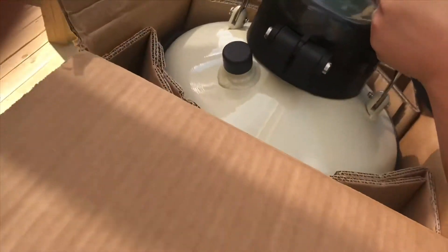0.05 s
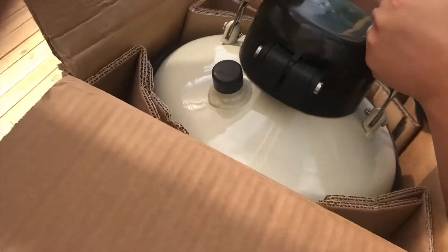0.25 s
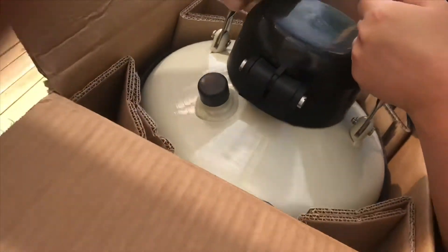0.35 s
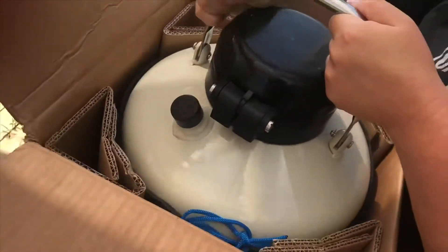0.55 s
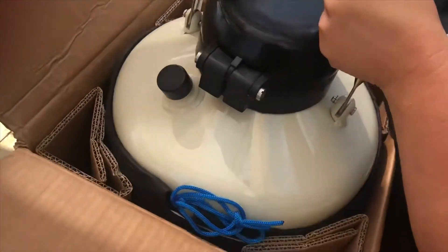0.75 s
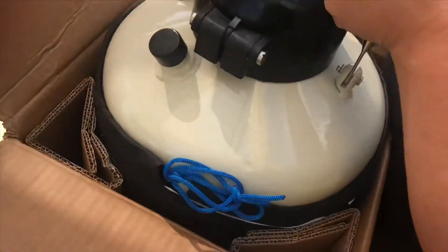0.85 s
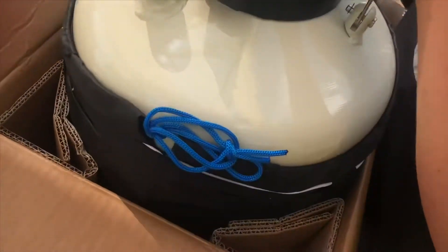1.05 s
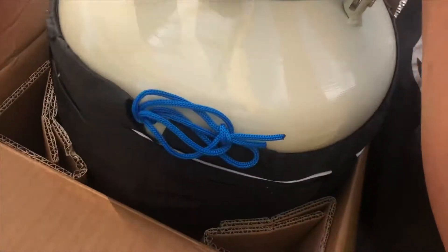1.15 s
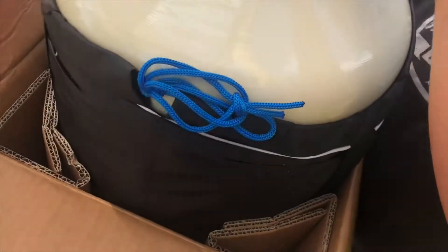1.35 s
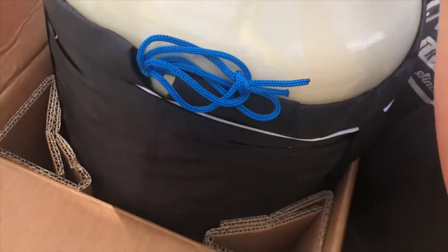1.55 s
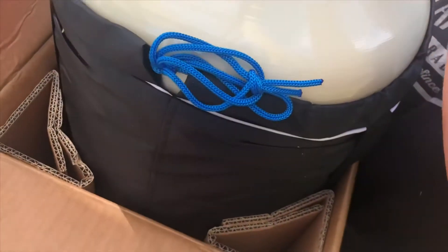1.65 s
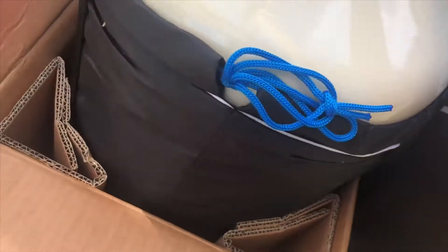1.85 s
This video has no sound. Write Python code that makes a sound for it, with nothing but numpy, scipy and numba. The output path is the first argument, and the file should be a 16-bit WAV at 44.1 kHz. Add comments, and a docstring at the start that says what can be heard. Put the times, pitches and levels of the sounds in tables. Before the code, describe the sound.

A cloth-sleeved metal tank scrapes out of a cardboard box, close up indoors. Short scuffs, thumps and a cardboard snap come around 0.3 seconds. From 0.5 seconds a long hissing slide runs over a low rumble, with dull knocks and a couple of snaps near 1 second. At about 1.6 seconds the tank judders free, then the hiss dulls and fades with a few faint dry ticks.

```python
"""A metal tank in a cloth sleeve is lifted out of a tight cardboard box, close up, indoors.
It opens on a few short scuffs, with thumps and a cardboard snap as the tank comes free.
From about half a second, one long hissing slide runs over the paper fibres, while the box walls
rumble under the drag, and thump and snap where the tank catches. Near 1.5 s it judders clear of
the packing; the hiss dulls and falls away, and a few dry fibres tick as the box settles."""
import sys
import numpy as np
from scipy import signal
from scipy.fft import rfft, irfft
from scipy.io import wavfile
from numba import njit

SR = 44100
rng = np.random.default_rng(int(sys.argv[2]) if len(sys.argv) > 2 else 0)


def wav_out(sig):
    """Save sig, one row per channel (or a flat mono array), as 16-bit PCM at SR to the path in sys.argv[1]."""
    wavfile.write(sys.argv[1], SR, np.round(np.clip(np.atleast_2d(sig).T, -1, 1) * 32767).astype(np.int16))


N = 83790

# fader moves of the long slide, ahead of trims and filters (time [s], rasp [dB], hiss [dB], sheen [dB])
SLIDE_FADERS = [(0.455,-56,-59,-66), (0.483,-40,-46.5,-53), (0.515,-42,-38.5,-47), (0.60,-41,-35,-44),
                (0.685,-41.5,-32.5,-39), (0.75,-41,-32.5,-35), (0.88,-39,-32,-35.5), (1.0,-38,-35.5,-37),
                (1.14,-37,-34,-37.5), (1.28,-41.5,-38.5,-45), (1.41,-39.5,-36,-38.5), (1.49,-40.5,-37,-39),
                (1.567,-38,-41.5,-47.5), (1.645,-41,-53.5,-59.5), (1.69,-45,-55,-60), (1.733,-40,-52,-59),
                (1.79,-61,-56.5,-61.5), (1.85,-43.5,-48.5,-54.5), (1.9,-42.5,-51,-54)]
# EQ of the slide's low rasp, mid hiss and top sheen (frequency [Hz], level [dB])
RASP_EQ = [(150, 2.5), (400, -7), (650, 1.5), (850, 0.5), (1150, -2), (1450, 1), (2000, -1), (2700, -7.5),
           (4000, -11.5), (8000, -26)]
HISS_EQ = [(1200, -14), (2400, -3), (2950, -2.5), (3400, -1), (3900, -1), (5000, -1.5), (6300, -4.5),
           (8000, -9), (12000, -47)]
SHEEN_EQ = [(4000, -19), (6000, -4.5), (7300, -2), (9500, -1), (12000, -5.5), (15500, -9)]
# the hiss brightens with the speed of the slide (time [s], sweep centre [Hz])
HISS_SWEEP = [(0.48, 3520), (0.69, 4630), (0.77, 7560), (0.88, 7440), (1.0, 4940), (1.14, 4500),
              (1.3, 5360), (1.45, 6650), (1.57, 4000), (1.66, 2430), (1.78, 2260), (1.86, 3500)]
# scuffs of the tank on the packing
# (start [s], attack [s], length [s], level [dB], rasp offset [dB], sizzle offset [dB])
SCUFF_CUES = [(-0.01, .004, 0.025, -52.5, 10, -2), (0.012, .006, 0.068, -56, 2.5, -3),
              (0.084, 0.015, 0.016, -45.5, -3.5, -12), (0.2092, 0.0012, .011, -37, -10, -10),
              (0.218, 0.0013, .012, -49.5, 4.5, -13), (0.231, 0.0028, .018, -51.5, -6, -15),
              (0.243, 0.016, 0.056, -38, -10, -5.5), (0.287, .011, 0.023, -32, -5, -5),
              (0.31, .003, 0.017, -39, -11, -6), (0.329, 0.0033, 0.1004, -47, -2, -11),
              (0.414, .005, 0.04, -54.5, 1, -18)]
# EQ of a scuff's body and of its top sizzle (frequency [Hz], level [dB])
SCUFF_EQ = [(500, -4), (1700, -11.5), (2900, -9.5), (4400, -3.5), (5250, 1), (6100, -2), (7600, -8),
            (10500, -16), (15500, -21)]
SIZZLE_EQ = [(5000, -25), (8000, -2), (11000, -6.5), (13000, 1), (15500, -1.5)]
# the tank catches on a box wall (time [s], level [dB], wall pitch [Hz])
THUMP_CUES = [(0.1975, -29, 334), (0.211, -36, 151), (0.289, -29, 374), (0.313, -27, 266),
              (0.324, -33, 194), (0.342, -33.5, 137), (0.39, -31, 190), (0.400, -39, 91),
              (0.5125, -23, 248), (0.5145, -29.5, 466), (0.525, -20.5, 186), (0.529, -30.5, 487),
              (0.549, -29.5, 165), (0.571, -27.5, 213), (0.593, -30.5, 116), (0.687, -36.5, 186),
              (0.784, -31.5, 107), (0.793, -31.5, 227), (0.807, -30, 150), (0.889, -27, 227),
              (0.897, -18.5, 450), (0.896, -19.5, 215), (0.908, -23.5, 290), (0.927, -28.5, 143),
              (1.087, -32, 233), (1.33, -31, 145), (1.352, -31, 225), (1.469, -20.5, 386),
              (1.478, -31.5, 132)]
# the tank sticks and slips as it clears the packing (time [s], level [dB], flap pitch [Hz])
JUDDER_CUES = [(1.534, -23, 247), (1.5525, -18.5, 465), (1.561, -14.5, 250), (1.5745, -19, 496),
               (1.577, -19, 212), (1.587, -23.5, 205), (1.589, -18.5, 476), (1.5995, -19, 470),
               (1.608, -18.5, 190), (1.614, -23, 323), (1.637, -26, 435), (1.650, -29.5, 208)]
# partials of pressed cardboard (pitch multiple [ratio], level [dB])
FLEX_PARTIALS = [(.45, -6.5), (0.999, 0), (2.05, -12.5)]
# resonances of the box walls (frequency [Hz], relative level [dB], t60 [s])
BOX_MODES = [(77.5, 0, 0.071), (135, -3, 0.037), (170, 2.5, 0.13), (210.5, -5, 0.071), (264, -9, 0.071),
             (382, 3, 0.05), (514, 7, 0.13)]
# cardboard creases snap (time [s], level [dB], pitch [Hz])
SNAP_CUES = [(0.2591, -29, 2880), (0.2835, -15, 1550), (0.3317, -31.5, 2620), (0.9587, -17.5, 1340),
             (1.07, -23, 1560), (1.748, -39, 4270), (1.837, -29, 3080)]
# ring of a snapping crease (pitch multiple [ratio], relative level [dB], t60 [s])
CREASE_MODES = [(.36, 0.5, 0.033), (.67, 5.5, 0.021), (1, 11, 0.0095), (1.3, 13, 0.0042),
                (2.75, 6.5, 0.0045)]
# fader moves of the dragged box's rumble, ahead of its trim (time [s], level [dB])
RUMBLE_FADER = [(0, -37), (.17, -40.5), (.23, -31.5), (.28, -45), (.41, -38), (.46, -42), (.52, -51),
                (.6, -32), (.73, -42), (.82, -30), (1.1, -42.5), (1.27, -37), (1.36, -36.5), (1.62, -42),
                (1.74, -36), (1.8, -43), (1.9, -65)]
# single dry fibres tick as the box settles (time [s], level [dB])
TICK_CUES = [(1.681, -46), (1.6885, -44), (1.8075, -49)]
# EQ of the rumble, a fibre tick and the room tone (frequency [Hz], level [dB])
RUMBLE_EQ = [(22, 3), (40, -3), (60, 2.5), (100, 0), (200, -9), (330, -12), (700, -27), (2000, -43)]
TICK_EQ = [(3000, -17), (6500, 0), (15000, -3)]
ROOM_TONE_EQ = [(40, 8), (150, -1), (500, -1), (1500, -9), (3000, -13.5), (6000, -15.5), (9000, -37),
                (15000, -45)]
# echoes between the rising tank and the box walls (first delay [ms], last delay [ms], gain [ratio])
GAP_ECHOES = [(0.67, 0.515, 0.056), (2.5, 1.26, -0.042), (1.64, 2.29, 0.1)]

RASP_TRIM_DB, HISS_TRIM_DB, SHEEN_TRIM_DB = 1.5, -1.5, 0.2
FOCUS_DB, FOCUS_DAMPING = -5, 0.45
RASP_CUTOFF_RATIO, RASP_DAMPING = 0.56, 1.17  # the rasp's cutoff rides below the sweep centre
FIBRES_PER_S, FIBRE_SPREAD_DB = 18000, 1.6
CHATTER_PER_S, CHATTER_DB = 120, 0.47
ROOM_T60_S, ROOM_ONSET_S, ROOM_TOP_HZ, ROOM_WET_DB = 0.16, 0.011, 2960, -15
ROOM_TONE_DB = -56
LOW_CUT_HZ, HIGH_CUT_HZ = 45, 15800


def slide(t):
    """The sleeve drags on cardboard: rasp, hiss and sheen from the same slips, brighter with speed."""
    times, rasp_db, hiss_db, sheen_db = np.array(SLIDE_FADERS).T
    fade_in = np.clip((t - times[0]) / 0.017 + 1, 0, 1)
    slips = fibre_slips()

    def layer(eq, fader_db):
        polarity = np.sign(rng.standard_normal(N))
        return colour(slips * polarity, eq) * undb(np.interp(t, times, fader_db))

    rasp = layer(RASP_EQ, rasp_db + RASP_TRIM_DB)
    hiss = layer(HISS_EQ, hiss_db + HISS_TRIM_DB)
    sheen = layer(SHEEN_EQ, sheen_db + SHEEN_TRIM_DB)
    centre_hz = np.interp(t, *np.array(HISS_SWEEP).T)
    rasp, _ = sweep(rasp, RASP_CUTOFF_RATIO * centre_hz, RASP_DAMPING)
    _, focus = sweep(hiss + sheen, centre_hz, FOCUS_DAMPING)
    return fade_in * (rasp + hiss + sheen + undb(FOCUS_DB) * focus)


def fibre_slips():
    """The grain of the scrape: tiny slips of paper fibres, bunching as the contact chatters."""
    slips = rng.random(N) < FIBRES_PER_S / SR
    sizes = undb(FIBRE_SPREAD_DB * np.minimum(rng.exponential(size=N), 5))
    polarity = np.sign(rng.standard_normal(N))
    chatter = undb(CHATTER_DB * wander(CHATTER_PER_S))
    return slips * sizes * polarity * chatter


def scuffs(t, release_s=0.0054):
    """Brief scrapes that swell and stop short while the tank works loose."""
    body, rasp, sizzle = np.zeros((3, N))
    for start, attack, length, db, rasp_db, sizzle_db in SCUFF_CUES:
        swell = np.clip((t - start) / attack, 0, 1)
        release = np.exp(-np.maximum(t - start - length, 0) / release_s)
        envelope = undb(db) * swell * release
        body = np.maximum(body, envelope)
        rasp = np.maximum(rasp, envelope * undb(rasp_db))
        sizzle = np.maximum(sizzle, envelope * undb(sizzle_db))
    layers = (body, SCUFF_EQ), (rasp, RASP_EQ), (sizzle, SIZZLE_EQ)
    return sum(envelope * colour(fibre_slips(), eq) for envelope, eq in layers)


def thumps(t, ring_db=-10.5):
    """Single catches and the closing judder knock the walls; the box rings faintly after them."""
    knocks = cardboard_flex(THUMP_CUES, t) + cardboard_flex(JUDDER_CUES, t)
    age = t[:SR // 4]
    ring = np.zeros(len(age))
    for hz, db, t60 in BOX_MODES:
        envelope = decay(age, t60)
        ring += undb(db) * 2 * np.cos(2 * np.pi * hz * age) * envelope / envelope.sum()
    return knocks + undb(ring_db) * signal.fftconvolve(knocks, ring)[:N]


def cardboard_flex(cues, t, rise_cycles=0.86):
    """Cardboard pressed by the tank swings only a few times; the overtone dies first."""
    out, age = np.zeros(N), t[:SR // 12]
    for start, level_db, hz in cues:
        for ratio, db in FLEX_PARTIALS:
            rise = max(ratio, 1) * hz * age / rise_cycles
            envelope = (rise * np.exp(1 - rise)) ** 2
            add(out, start, undb(level_db + db) * envelope * np.sin(2 * np.pi * ratio * hz * age))
    return out


def snaps(t, crack_db=-16, crack_t60_s=0.0035):
    """A crease gives way: a short ring with a crack of noise on the attack."""
    out, age = np.zeros(N), t[:SR // 16]
    for start, level_db, hz in SNAP_CUES:
        ring = sum((-1) ** k * undb(db) * decay(age, t60) * np.sin(2 * np.pi * hz * ratio * age)
                   for k, (ratio, db, t60) in enumerate(CREASE_MODES))
        crack = undb(crack_db) * decay(age, crack_t60_s) * rng.standard_normal(len(age))
        add(out, start, undb(level_db) * (ring / np.abs(ring).max() + crack))
    return out


def rumble(t, trim_db=-6.5):
    """The low end: box walls flex under the drag."""
    fader_db = np.interp(t, *np.array(RUMBLE_FADER).T)
    return colour(rng.standard_normal(N), RUMBLE_EQ) * undb(fader_db + trim_db)


def ticks(t, t60_s=0.011):
    """Tiny bright clicks of paper fibres letting go."""
    out, age = np.zeros(N), t[:SR // 32]
    for start, db in TICK_CUES:
        add(out, start, undb(db) * decay(age, t60_s) * colour(rng.standard_normal(len(age)), TICK_EQ))
    return out


def gap_echoes(x, t):
    """Gliding echoes in the gap between tank and box put a light flange on the scrape."""
    return x + sum(gain * np.interp(t - np.linspace(first_ms, last_ms, N) / 1000, t, x)
                   for first_ms, last_ms, gain in GAP_ECHOES)


def room_reverb(x, t):
    """The room answers with a short, dull tail."""
    age = t[:SR // 2]
    tail = rng.standard_normal(len(age)) * decay(age, ROOM_T60_S) * np.minimum(age / ROOM_ONSET_S, 1)
    low_pass = signal.butter(1, ROOM_TOP_HZ, fs=SR, output="sos")
    tail = signal.sosfilt(low_pass, tail / np.linalg.norm(tail))
    return x + undb(ROOM_WET_DB) * signal.fftconvolve(x, tail)[:N]


def room_tone():
    """A faint, steady bed of dark indoor air."""
    return undb(ROOM_TONE_DB) * colour(rng.standard_normal(N), ROOM_TONE_EQ)


def undb(db):
    """Decibels to gain."""
    return 10 ** (np.asarray(db) / 20)


def unit_rms(x):
    """Scale to rms 1."""
    return x / np.sqrt(np.mean(x ** 2))


def colour(x, eq):
    """Apply an EQ curve and scale to rms 1."""
    hz, db = np.array(eq, float).T
    bin_hz = np.maximum(np.arange(len(x) // 2 + 1) * SR / len(x), 1)
    gain = undb(np.interp(np.log(bin_hz), np.log(hz), db))
    return unit_rms(irfft(rfft(x) * gain, len(x)))


def decay(t, t60):
    """Exponential fall, 60 dB in t60 seconds."""
    return np.exp(-np.log(1000) * t / t60)


def wander(per_s):
    """Glide between random values; rms 1."""
    return unit_rms(np.interp(np.arange(N) * per_s / SR, np.arange(N), rng.standard_normal(N)))


def add(out, start, sound):
    """Mix a sound in at a time in seconds."""
    i = max(int(start * SR), 0)
    out[i:i + len(sound)] += sound[:N - i]


@njit
def sweep(x, hz, damping):
    """Swept state-variable filter; returns its low-pass and its band-pass."""
    out, band_state, low_state = np.empty((2, len(x))), 0., 0.
    for i in range(len(x)):
        g = np.tan(np.pi * hz[i] / SR)
        band = (band_state + g * (x[i] - low_state)) / (1 + g * (g + damping))
        out[0, i], out[1, i] = low_state + g * band, damping * band
        band_state, low_state = 2 * band - band_state, low_state + 2 * g * band
    return out


def scene():
    """Tank and box in a quiet room, the same in both channels."""
    t = np.arange(N) / SR
    scrape = gap_echoes(slide(t) + scuffs(t), t)
    foley = scrape + rumble(t) + thumps(t) + snaps(t) + ticks(t)
    mono = room_reverb(foley, t) + room_tone()
    return np.array([mono, mono])


def record(dry):
    """The microphone thins the deep bass and cuts the top."""
    low_cut = signal.butter(4, LOW_CUT_HZ, "high", fs=SR, output="sos")
    high_cut = signal.ellip(10, .2, 80, HIGH_CUT_HZ, fs=SR, output="sos")
    return signal.sosfilt(high_cut, signal.sosfilt(low_cut, dry))


dry = scene()
out = record(dry)
wav_out(out)
```